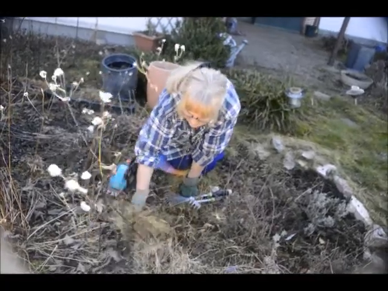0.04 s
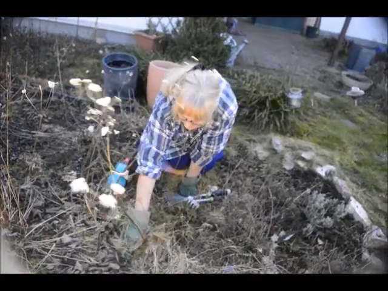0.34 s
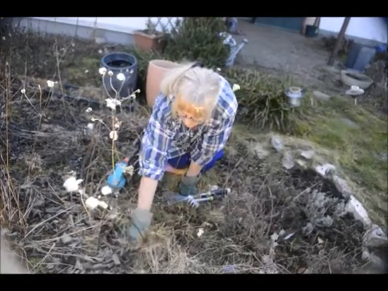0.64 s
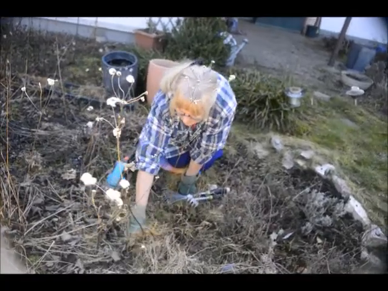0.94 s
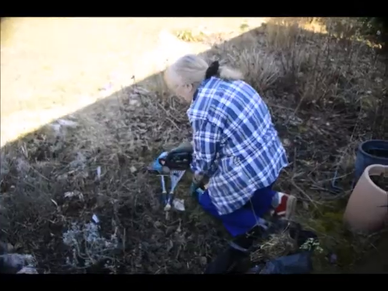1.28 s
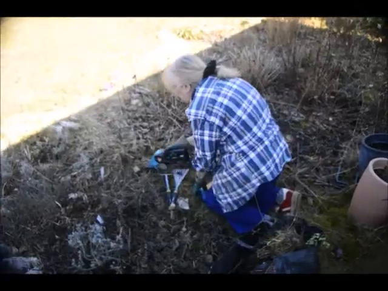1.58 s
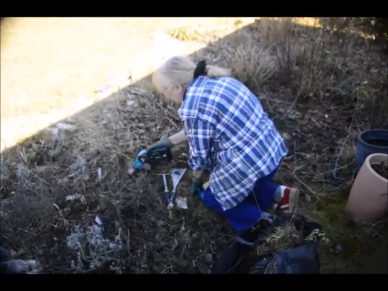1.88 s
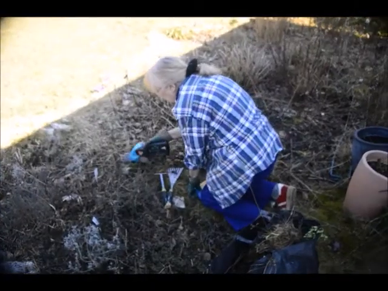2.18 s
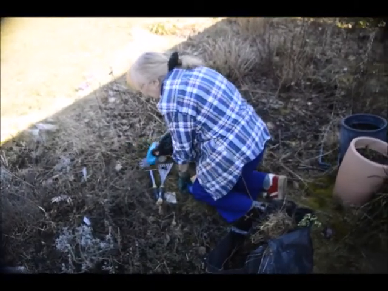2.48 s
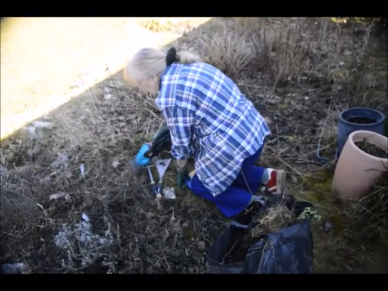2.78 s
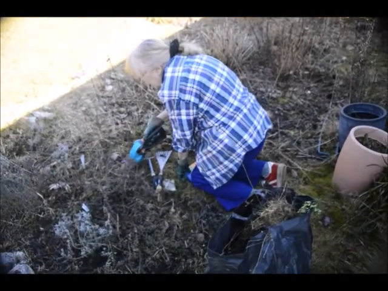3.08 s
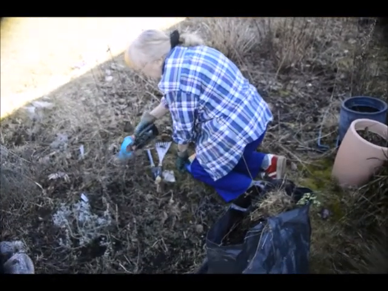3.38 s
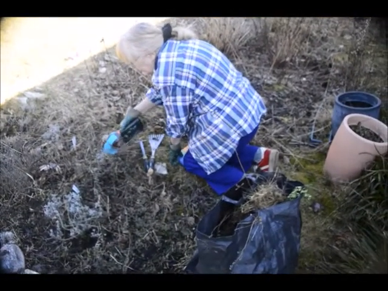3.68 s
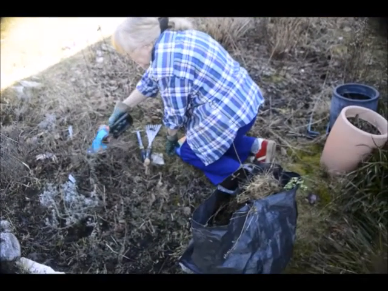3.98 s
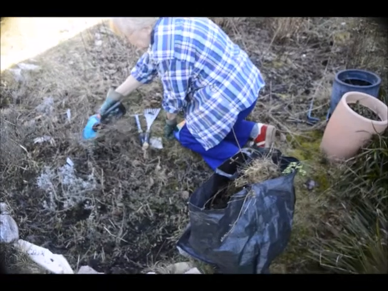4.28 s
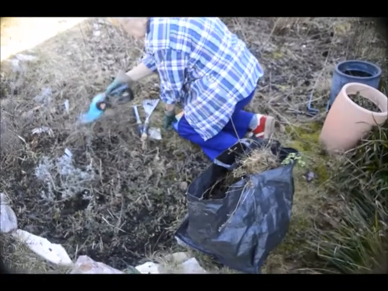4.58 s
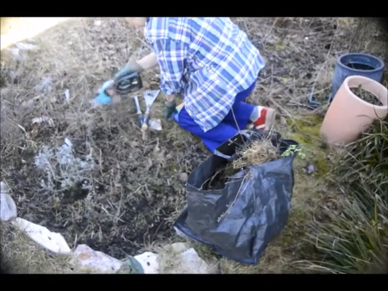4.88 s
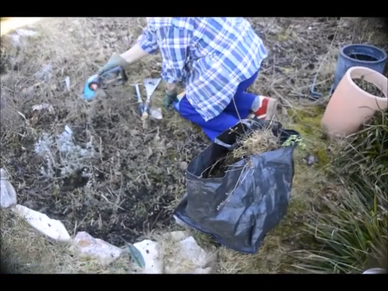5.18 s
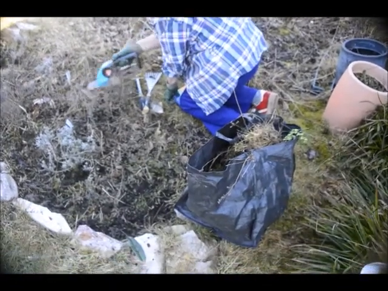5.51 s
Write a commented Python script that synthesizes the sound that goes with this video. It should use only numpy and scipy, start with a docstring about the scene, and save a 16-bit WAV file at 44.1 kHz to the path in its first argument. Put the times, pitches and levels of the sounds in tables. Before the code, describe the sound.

A hand rakes dry grass and snaps twigs, then cordless grass shears rattle and tick, crunching through dry stems.

```python
"""A gloved hand rakes through dry grass in a garden bed, snapping twigs over a faint outdoor rumble.
The raking cuts off abruptly and cordless grass shears fade in: their toothed blade swings about twelve
times a second, ticking at each reversal and scraping over the fixed blade while gears rattle the housing.
Dry stems crunch between the teeth, the steel squeaks once, and the tool bumps something hard.
Then it digs in deeper, and the loudest cracks overload."""
import sys
import numpy as np
from scipy import signal
from scipy.fft import rfft, irfft, next_fast_len
from scipy.io import wavfile

SR = 44100
rng = np.random.default_rng(int(sys.argv[2]) if len(sys.argv) > 2 else 0)


def output_pcm(signal):
    """Save a mono or channel-first signal as 16-bit PCM at the path in sys.argv[1].

    Samples are clipped to [-1, 1] before scaling.
    """
    pcm = np.clip(np.atleast_2d(signal).T, -1, 1) * 32767
    wavfile.write(sys.argv[1], SR, np.round(pcm).astype(np.int16))


N = 249165
TIME = np.arange(N) / SR
RAKING_END_S, BUMP_S = 1.168, 2.551

# The hand's steady brushing. Each row: time in seconds, relative crackle level in dB.
BRUSHING = [(0, -42), (0.14, -44), (0.24, -37), (0.66, -37.5), (0.76, -41.5), (0.88, -43), (1.0, -48),
            (1.16, -43)]
# Pulls through the grass. Each row: crest time in seconds, length in seconds, relative crackle in dB.
PULLS = [(0.007, 0.0086, -25.5), (0.06, 0.053, -33), (0.169, 0.013, -34), (0.317, 0.019, -40),
         (0.395, 0.021, -35), (0.491, 0.037, -29), (0.615, 0.03, -37), (0.688, 0.032, -33),
         (0.818, 0.03, -40), (1.11, 0.086, -39)]
# Twigs snapping under the hand. Each row: start in seconds, relative level in dB.
TWIGS = [(0.0034, -20), (0.0603, -12.5), (0.1128, -15.5), (0.2348, -15.5), (0.249, -17), (0.3164, -13),
         (0.402, -6.5), (0.613, -18), (0.6305, -18.5), (0.676, -19), (0.6906, -15), (0.7968, -21),
         (0.8464, -20.5), (0.9453, -25), (1.026, -32)]
# Tone colours of the raking and the air. Each row: frequency in Hz, relative gain in dB.
CRACKLE_EQ = [(2000, -25), (3500, -5), (5000, -4), (7000, -5.5), (9000, 2.5), (10500, 1.5), (12000, -8.5),
              (16000, -18)]
SWISH_EQ = [(150, -7.5), (300, -7), (500, -11.5), (750, -7.5), (1050, 0), (1500, -7), (2200, -6),
            (3300, -6), (5000, -16.5)]
TWIG_EQ = [(200, -24), (1000, -9.5), (3000, -7), (6000, 1), (10000, 3), (12000, -2.5), (16000, -30)]
AIR_EQ = [(20, -14), (50, 1), (100, 4.5), (160, -11.5), (400, -12), (1500, -19), (6000, -22), (16000, -27)]
# Fader ride of the outdoor rumble. Each row: time in seconds, level in dB.
AIR_LEVEL = [(0, -55.5), (1.16, -57.5), (1.18, -71), (1.35, -84), (1.6, -62.5), (5.65, -65)]

# The gear noise swells up, then holds. Each row: time in seconds, relative gear level in dB.
GEAR_LEVEL = [(1.2, -73), (1.4, -59), (1.46, -48), (1.6, -34.5), (1.72, -31), (2.0, -30), (4.34, -28),
              (5.65, -27.5)]
# How deep the blades sit in the plants. Each row: time in seconds, load from 0 to 1.
LOAD = [(1.2, 0.26), (2.4, 0.08), (2.9, 0.58), (3.3, 0.81), (3.8, 0.81), (4.35, 0.89), (4.65, 0.17),
        (5.1, 0.47), (5.65, 0.08)]
# Drive speed, with sags for thick bites. Each row: time in seconds, blade cycles per second.
CYCLE_RATE = [(1.61, 12.54), (1.82, 11.03), (1.92, 12.35), (2.29, 12.65), (2.83, 12.26), (2.92, 11.63),
              (3.2, 12.14), (3.84, 11.76), (4.0, 10.38), (4.06, 11.78), (4.3, 11.59), (4.52, 12.5),
              (4.89, 12.48), (5.11, 10.07), (5.24, 11.15), (5.4, 12.41)]
# Outward, then return stroke. Each row: tick free, tick loaded, scrape free, scrape loaded, in relative dB.
STROKE_LEVELS = [(5.5, 15, 7.5, 15), (12.5, 9, 6, 10.5)]
# Wedged stalks make the nearest reversal knock harder. Each row: time in seconds, boost in dB.
JAMS = [(2.126, 5), (2.17, 11), (2.205, 5.5), (2.444, 4), (3.065, 6.5), (3.313, 5), (3.69, 9), (3.73, 5.5),
        (4.083, 4), (4.38, 4.5), (4.46, 6.5), (4.507, 7), (5.18, 9)]
# Blade and housing resonances. Each row: pitch and width in Hz, relative dB running free and under load.
TOOL_MODES = [(126, 8.5, -30.5, -36.5), (346, 63, -19, -14.5), (1262, 36, -32, -6), (1424, 46, -7, -22.5),
              (1780, 126, -10, -11.5), (1913, 130, -9.5, -6.5), (2837, 86, -11, -11.5),
              (3204, 69, -13.5, -10.5), (3516, 57, -19.5, -9), (4260, 100, -26, -5.5),
              (5480, 400, -14.5, -10), (6410, 500, -29, 0), (6500, 290, -17, 2), (8520, 390, -20, -4.5),
              (10330, 430, -8, -1)]
# Tone colours of the shears and the cut stems. Each row: frequency in Hz, relative gain in dB.
STEEL_EQ = [(3000, -8), (5000, -17), (6500, -6), (7600, -2), (9000, 5), (10600, 0.5), (11600, -7.5),
            (13000, -12.5), (16000, -23)]
HOUSING_EQ = [(40, -11.5), (150, -13), (280, -5), (500, -9.5), (800, -2), (1200, -1), (2200, -1.5),
              (3600, 1.5), (4800, -5), (6000, -8), (9000, -6)]
CRACK_EQ = [(2500, -19.5), (4500, -12), (6500, -3.5), (8500, 0), (10500, 4), (12000, -7.5), (16000, -46)]
CRUNCH_EQ = [(70, -25), (180, -6), (330, 3), (600, 4.5), (1200, 6), (2000, 6), (3800, 8.5), (6000, -13)]
# Thick stems crushed by the teeth. Each row: time in seconds, crack and crunch levels in relative dB.
THICK_STEMS = [(1.237, -47, -59), (1.446, -38, -47), (1.6558, -21, -30), (1.7615, -23, -29),
               (1.826, -12.5, -23), (2.5513, -33, -27.5), (2.7936, -5, -19), (2.9134, -8, -21),
               (3.001, -16.5, -48), (3.0833, -19, -32), (3.2947, -14, -36), (3.4604, -6.5, -22),
               (3.6695, -5, -21.5), (3.756, -6.5, -25.5), (3.7978, -3.5, -24), (3.8392, -6, -19),
               (3.8835, -5, -19), (3.922, -15, -26.5), (3.9697, -3.5, -20), (4.1475, -16, -28),
               (4.229, -13, -25.5), (4.2761, -10, -22), (4.4003, -9, -25), (4.4882, -10, -45),
               (4.9713, -13.5, -23), (5.0104, -14, -26.5), (5.0615, -4, -20.5), (5.1016, -20, -24.5),
               (5.1544, -4.5, -18), (5.2548, -13, -23.5), (5.2906, -16, -23)]
# Moments when the running noise thins to a ringing. Each row: centre and half length in seconds.
LULLS = [(1.897, .009), (2.282, .006), (2.892, .016), (3.198, .009), (3.474, .008), (3.899, .009),
         (4.033, .006), (4.992, .007), (5.436, .005), (5.61, .007)]
# The tones that ring in a lull. Each row: pitch in Hz, relative level in dB.
LULL_TONES = [(1310, -6.5), (1830, -0.5), (2980, 5.5), (3570, -2), (6800, 2.5), (7900, 6), (9050, 7.5),
              (10050, -10), (10550, 8)]
# A thin squeak of steel on steel. Each row: time in seconds, pitch in Hz, level in dB.
SQUEAK = [(2.08, 4460, -70), (2.12, 4440, -32), (2.17, 4400, -34), (2.22, 4480, -33), (2.26, 4450, -72)]
# The ring of the bump. Each row: pitch in Hz, level in dB, seconds to fall by 60 dB.
BUMP_MODES = [(249, -36, 0.16), (910, -45, 0.033), (2250, -28, 0.11), (3720, -32, 0.046),
              (4370, -17, 0.034), (4940, -33, 0.077)]


def from_db(db):
    return 10 ** (np.asarray(db) / 20)


def rms_one(x):
    return x / np.sqrt(np.mean(x ** 2) + 1e-20)


def in_time(rows):
    """Each column of an automation curve at every sample."""
    s, *columns = np.transpose(rows)
    return [np.interp(TIME, s, c) for c in columns]


def drift(rate):
    """A random wander with spread 1, turning `rate` times a second."""
    knots = rng.standard_normal(1000)
    return np.interp(TIME * rate, np.arange(len(knots)), knots) * np.sqrt(3 / 2)


def colour(x, eq):
    """Minimum-phase EQ that rolls off beyond its end points; white noise keeps its power."""
    size = 2 * next_fast_len(N)
    hz, db = np.transpose(eq)
    octave = np.log2(np.maximum(np.arange(size // 2 + 1) * SR / size, 1))
    outside = np.abs(octave - np.clip(octave, np.log2(hz[0]), np.log2(hz[-1])))
    gain = rms_one(from_db(np.interp(octave, np.log2(hz), db) - 20 * np.minimum(outside, 2)))
    # folding the cepstrum keeps all ringing after the attack
    cepstrum = irfft(np.log(gain))
    cepstrum[1:size // 2] *= 2
    cepstrum[size // 2 + 1:] = 0
    return irfft(np.exp(rfft(cepstrum)) * rfft(x, size))[:N]


def resonate(x, hz, width_hz):
    """One resonance; white noise keeps its power."""
    r = np.exp(-np.pi * width_hz / SR)
    feedback = [1, -2 * r * np.cos(2 * np.pi * hz / SR), r * r]
    return signal.lfilter(np.sqrt((1 - r * r) / 2) * np.array([1, 0, -1]), feedback, x)


def random_sizes(spread_db):
    """A random grain strength for every sample, capped at three times the spread."""
    return from_db(spread_db * np.minimum(rng.exponential(1, N), 3))


def grit(per_s, spread_db, grain_s, smooth):
    """Friction noise: tiny catches of random size over a smooth share of hiss; rms 1."""
    sizes = random_sizes(spread_db)
    catches = (rng.random(N) < per_s / SR) * sizes ** 2
    power = signal.lfilter([1], [1, -np.exp(-2 / (grain_s * SR))], catches + 1e-18)
    return rng.standard_normal(N) * np.sqrt(smooth + (1 - smooth) * power / power.mean())


def pings(per_s, spread_db, width_hz, low_hz, high_hz, count):
    """Stalks or teeth of many sizes are flicked at random, each ringing at its own pitch; rms 1."""
    sizes = random_sizes(spread_db)
    flicks = (rng.random(N) < per_s / SR) * sizes * rng.choice([-1, 1], N)
    struck = rng.integers(0, count, N)
    pitches = np.geomspace(low_hz, high_hz, count) * (1 + rng.normal(0, 1 / 50, count))
    rings = (resonate(flicks * (struck == k) + 1e-18, hz, width_hz) for k, hz in enumerate(pitches))
    return rms_one(sum(rings))


def bursts(times, levels_db, rise_s, fall_s):
    """Noise that swells to each time and dies away after it."""
    envelope = np.zeros(N)
    for s, db in zip(times, levels_db):
        near = slice(max(int(s * SR) - SR // 20, 0), int(s * SR) + SR // 10)
        age = TIME[near] - s
        envelope[near] += from_db(db) * np.exp(np.minimum(age / rise_s, -age / fall_s))
    return envelope * rng.standard_normal(N)


def raking():
    """Dry grass crackles, soft blades swish and stalks flick, all swelling with each pull of the hand."""
    power = from_db(in_time(BRUSHING)[0]) ** 2
    for s, length, db in PULLS:
        power += from_db(db) ** 2 * np.exp(-np.square(2 * (TIME - s) / length))
    crackle_db = 10 * np.log10(power)
    swish_db = -47 + 0.49 * (crackle_db + 37.5)  # rides the crackle with about half the swing
    crackle = from_db(crackle_db - 1) * grit(per_s=400, spread_db=-1, grain_s=0.0021, smooth=0.39)
    swish = from_db(swish_db) * grit(per_s=400, spread_db=9.5, grain_s=0.0014, smooth=0.75)
    stalks = pings(per_s=220, spread_db=5.5, width_hz=34, low_hz=848, high_hz=6470, count=40)
    return colour(crackle, CRACKLE_EQ) + colour(swish, SWISH_EQ) + from_db(swish_db - 2) * stalks


def twigs():
    """Each twig breaks with a sharp snap and a softer tail of splinters."""
    s, db = np.transpose(TWIGS)
    snaps = bursts(s + 0.00147, db - 3.5, rise_s=0.000088, fall_s=0.00062)
    splinters = bursts(s + 0.002, db - 16, rise_s=0.0011, fall_s=0.0074)
    return colour(snaps + splinters, TWIG_EQ)


def garden_air():
    """A faint bed of outdoor rumble; it drops away when the raking ends and returns with the shears."""
    return from_db(in_time(AIR_LEVEL)[0]) * colour(rng.standard_normal(N), AIR_EQ)


def strokes(first_cycle_s=1.2712, outward_share=0.461, tick_spread_db=1.5, scrape_spread_db=1.4):
    """Time, tick dB and scrape dB of each stroke: two a cycle, as strong as drive and load make them."""
    cycles = np.cumsum(in_time(CYCLE_RATE)[0]) / SR
    cycles -= np.interp(first_cycle_s, TIME, cycles)
    reversals = (np.arange(int(cycles[-1]) + 1)[:, None] + [0, outward_share]).ravel()
    s = np.interp(reversals[reversals < cycles[-1]], cycles, TIME)
    gears_db = np.interp(s, *np.transpose(GEAR_LEVEL))
    load = np.interp(s, *np.transpose(LOAD))
    direction = np.arange(len(s)) % 2
    tick_free, tick_loaded, scrape_free, scrape_loaded = np.array(STROKE_LEVELS)[direction].T
    tick_jitter, scrape_jitter = (rng.standard_normal((len(s), 2)) * [tick_spread_db, scrape_spread_db]).T
    tick_db = gears_db + tick_free + (tick_loaded - tick_free) * load + tick_jitter
    scrape_db = gears_db + scrape_free + (scrape_loaded - scrape_free) * load + scrape_jitter
    for jam_s, boost_db in JAMS:
        tick_db[np.argmin(np.abs(s - jam_s))] += boost_db
    return s, tick_db, scrape_db


def blade_motion(s, stroke_db, floor=0.13, start_share=0.32, skew=0.63):
    """Sliding speed and scrape dB: the blade jumps off each reversal, speeds up, then slows again."""
    edges = np.append(s, 2 * s[-1] - s[-2])
    turns = np.interp(TIME, edges, np.arange(len(edges)))
    speed = np.abs(np.sin(np.pi * (start_share + (1 - start_share) * (turns % 1) ** skew)))
    stroke = np.minimum(turns.astype(int), len(s) - 1)
    return rms_one(floor + speed), stroke_db[stroke]


def tool_ring(shake):
    """Blades and housing ring; each mode shifts with load and wavers as the contact point wanders."""
    load = in_time(LOAD)[0]
    ring = np.zeros(N)
    for k, (hz, width_hz, free_db, loaded_db) in enumerate(TOOL_MODES):
        level_db = free_db + (loaded_db - free_db) * load - 2 + 2 * drift(rate=22)
        ring += (-1) ** k * from_db(level_db) * resonate(shake, hz, width_hz)
    return ring


def shears():
    """Steel slides on steel and knocks at each reversal, while the gears shake the housing."""
    s, tick_db, stroke_db = strokes()
    speed, scrape_db = blade_motion(s, stroke_db)
    sliding = from_db(scrape_db) * speed
    gears = from_db(in_time(GEAR_LEVEL)[0])
    ticks = bursts(s + 0.00069, tick_db + 0.5, rise_s=0.00085, fall_s=0.0014)
    scrape = sliding * grit(per_s=540, spread_db=-3, grain_s=0.0011, smooth=0.29)
    teeth = sliding * pings(per_s=620, spread_db=4.5, width_hz=72, low_hz=6910, high_hz=11180, count=24)
    steel = colour(from_db(-8) * scrape + ticks, STEEL_EQ) + from_db(-10.5) * teeth
    rattle = gears * speed ** 0.48 * grit(per_s=250, spread_db=1.5, grain_s=0.0021, smooth=0.41)
    ring = tool_ring(from_db(1) * rattle + from_db(-3) * ticks)
    clatter = gears * speed ** 0.26 * grit(per_s=300, spread_db=1.5, grain_s=0.0023, smooth=0.24)
    housing = colour(from_db(-3) * clatter + from_db(-14.5) * ticks, HOUSING_EQ)
    stalks = gears * pings(per_s=260, spread_db=3.5, width_hz=19, low_hz=1085, high_hz=4400, count=32)
    return steel + ring + housing + from_db(-9.5) * stalks


def stems(thin_per_s=5):
    """Fibres give way faster and faster until the stem parts: a bright crack over a duller crunch."""
    # thin stems are caught at random; they would reach their rate only at full load
    caught = TIME[rng.random(N) < thin_per_s * in_time(LOAD)[0] ** 2 / SR]
    thin_stems = [(at, -15, -26.5) for at in caught]
    s, crack_db, crunch_db = np.transpose(list(THICK_STEMS) + thin_stems)
    crack = bursts(s, crack_db + 3.5, rise_s=0.0013, fall_s=0.0021)
    crunch = bursts(s, crunch_db + 4.5, rise_s=0.0032, fall_s=0.0039)
    return colour(crack, CRACK_EQ) + colour(crunch, CRUNCH_EQ)


def with_lulls(running, depth=0.97):
    """For an instant at a time, the running noise crossfades to a few narrow, wavering tones."""
    gears_db = in_time(GEAR_LEVEL)[0]
    tones = np.zeros(N)
    for hz, db in LULL_TONES:
        level_db = gears_db + db - 7.5 + 4.06 * drift(rate=4.076)
        tones += from_db(level_db) * resonate(rng.standard_normal(N), hz, width_hz=11)
    s, half_length = np.transpose(LULLS)
    distance = np.min(np.abs(TIME - s[:, None]) / half_length[:, None], axis=0)
    lull = depth * np.exp(-distance ** 6 / 2)
    return (1 - lull) * running + lull * tones


def squeak():
    """The blades rub dry for a moment and sing a wavering note."""
    hz, level_db = in_time(SQUEAK)
    sounding = (TIME > SQUEAK[0][0]) & (TIME < SQUEAK[-1][0])
    phase = 2 * np.pi * np.cumsum(hz + 20 * drift(rate=100)) / SR
    return sounding * from_db(level_db) * np.sin(phase)


def bump():
    """The tool knocks against something hard: a light thud with a short metallic ring."""
    age = np.maximum(TIME - BUMP_S, 0)
    return sum(from_db(db - 60 * np.minimum(age / t60, 2)) * np.sin(2 * np.pi * hz * age)
               for hz, db, t60 in BUMP_MODES)


def scene():
    """A hard cut from hand to shears over the garden air, in mono."""
    hand = (raking() + twigs()) * (TIME < RAKING_END_S)
    tool = (with_lulls(shears()) + stems() + squeak() + bump()) * (TIME >= RAKING_END_S)
    return (hand + tool + garden_air())[None]


def record(dry):
    """The loudest cracks overload, then a steep low-pass trims the top at 16 kHz."""
    lowpass = signal.ellip(10, 0.2, 70, 16000, fs=SR, output="sos")
    return signal.sosfilt(lowpass, np.clip(dry, -1, 1))


dry = scene()
out = record(dry)
output_pcm(out)
```